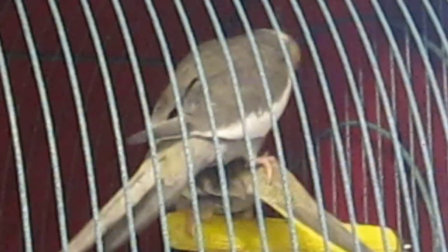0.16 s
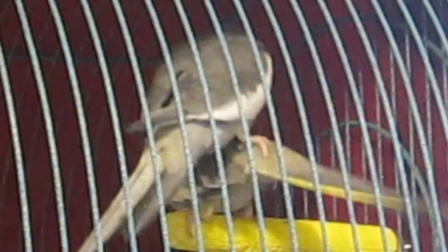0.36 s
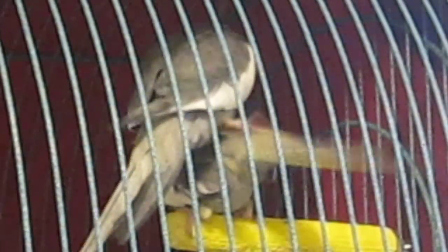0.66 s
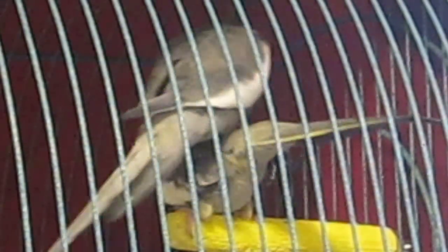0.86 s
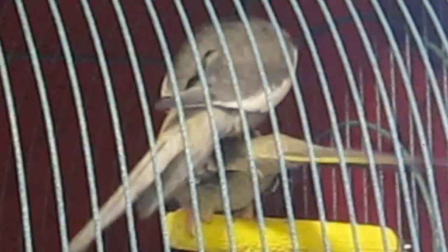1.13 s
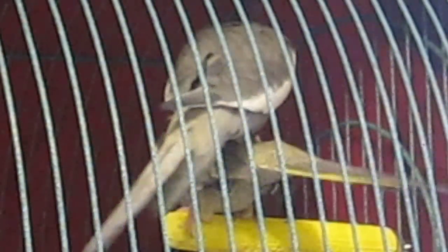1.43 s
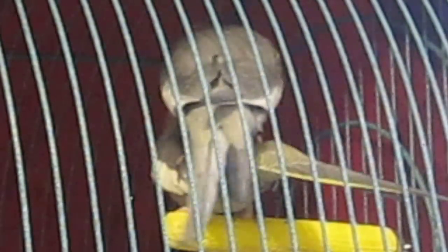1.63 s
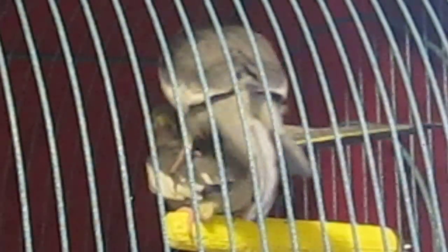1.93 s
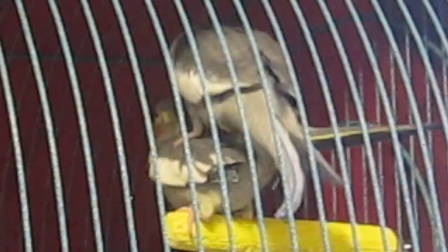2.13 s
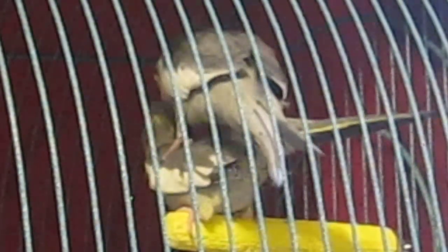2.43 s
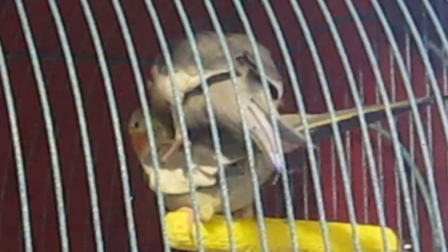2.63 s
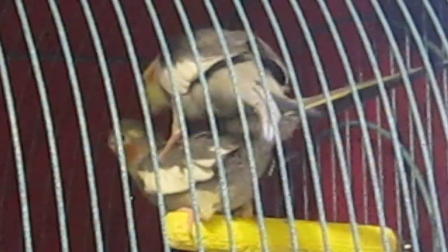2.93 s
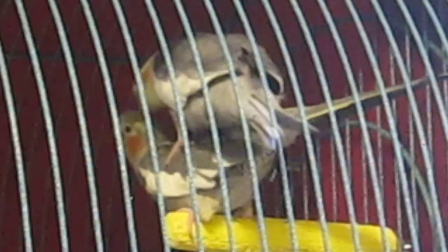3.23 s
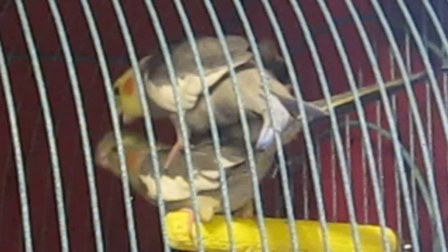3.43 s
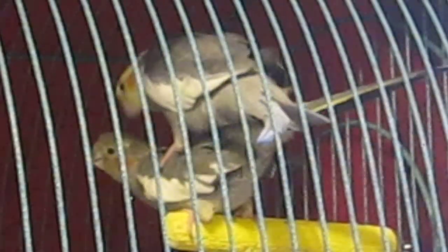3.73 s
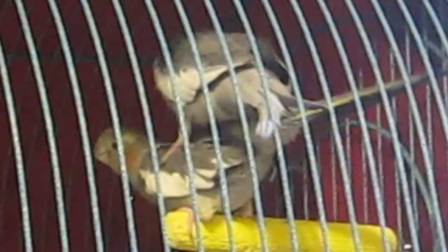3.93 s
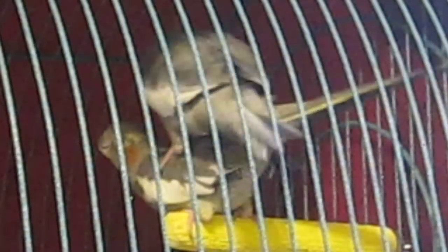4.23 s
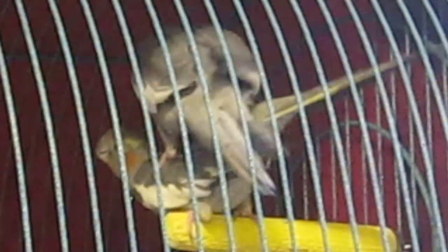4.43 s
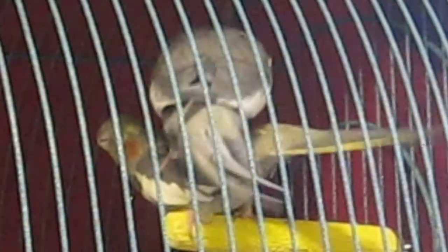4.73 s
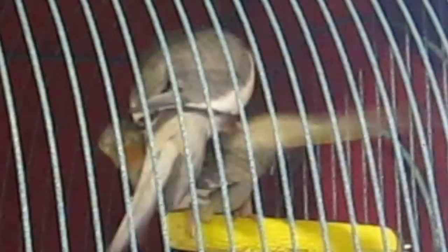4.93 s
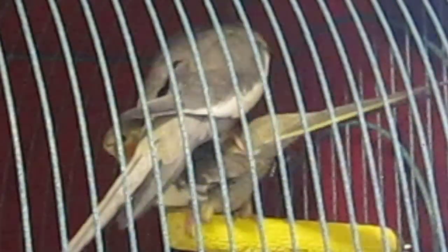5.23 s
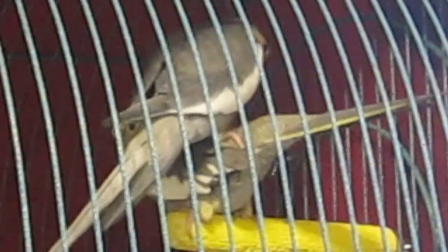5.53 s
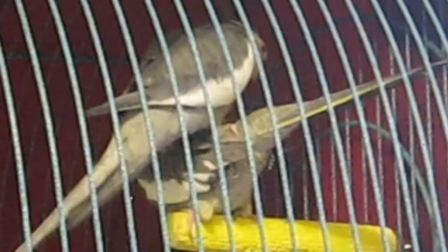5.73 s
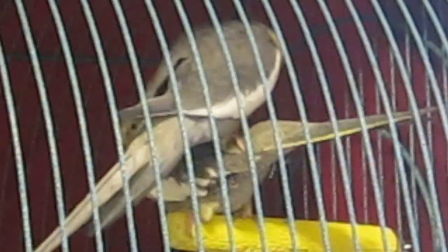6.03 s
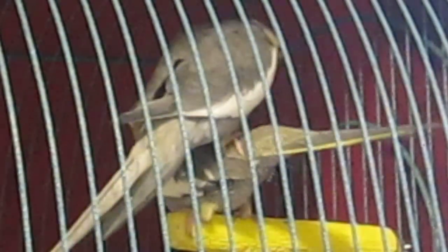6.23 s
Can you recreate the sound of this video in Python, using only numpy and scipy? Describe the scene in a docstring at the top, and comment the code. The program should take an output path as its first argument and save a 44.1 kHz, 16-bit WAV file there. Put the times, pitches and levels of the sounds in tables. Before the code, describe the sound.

In a quiet room at home, two caged cockatiels trade brief, high whistles that arch and fall away. The calls quickly grow harsher, breaking into raspy squawks, then ease back to scattered chirps before a last squawk. The birds are close and the room echoes slightly. Underneath are a steady soft hiss, a faint whine and a low hum that slowly rises, then drops back.

```python
"""Two cockatiels chirp and squawk close by, in a wire cage in a quiet room.
Each call is a whistle near 2.7 kHz from the syrinx, a bird's voice box. It arches, falls away
and breaks into a rasp when it is forced. Nearby walls throw the calls back.
The room hisses softly with a thin whine, and a low hum slowly swells, then sinks back."""
import sys
import numpy as np
from scipy import signal
from scipy.fft import rfft, irfft
from scipy.io import wavfile
from scipy.ndimage import uniform_filter1d

SR = 44100
rng = np.random.default_rng(int(sys.argv[2]) if len(sys.argv) > 2 else 0)


def transcribe(u):
    """Save the signal u as a 16-bit wav file named by the first command-line argument.

    u: samples, shape (n,) or (channels, n), limited to [-1, 1]; the rate is SR.
    q: integer samples, one column per channel.
    """
    v = np.clip(np.atleast_2d(u).T, -1, 1)
    q = np.round(v * 32767).astype(np.int16)
    wavfile.write(sys.argv[1], SR, q)


N = 280476
TIME = np.arange(N) / SR


def undb(db):
    """Turn decibels into a number to multiply by."""
    return 10 ** (np.asarray(db) / 20)


def unit(x):
    """Scale a signal so that its average size (rms) is 1."""
    return x / np.sqrt(np.mean(x ** 2))


def gain_at(hz, points):
    """Read the gain at a pitch from a curve of (pitch_hz, level_db) points."""
    pitch_hz, level_db = np.transpose(points)
    return undb(np.interp(np.log(hz + 1), np.log(pitch_hz), level_db))


def colour(x, points):
    """Turn each pitch in a sound up or down along such a curve."""
    return irfft(rfft(x) * gain_at(np.fft.rfftfreq(len(x), 1 / SR), points), len(x))


def band(hz, width_hz):
    """Noise gathered around one pitch; around 0 Hz it is a random wobble."""
    f = np.fft.rfftfreq(N, 1 / SR)
    return unit(irfft(rfft(rng.standard_normal(N)) / (1 + (2 * (f - hz) / width_hz) ** 2), N))


def drift(rate_hz):
    """A smooth random wander."""
    size = int(SR / rate_hz)
    return unit(uniform_filter1d(uniform_filter1d(rng.standard_normal(N), size), size))


def note_moments(start, crest, end, count=32):
    """Times through a note, the seconds left to its crest (its top), and how much of its fall is done."""
    times = np.linspace(start, end, count)
    return times, np.maximum(crest - times, 0), np.clip((times - crest) / (end - crest), 0, 1)


BEAK_CLOSE_DB = 3.5  # the beak closes as any note falls, dimming the overtone an octave up
# The birds' short whistles, one a row. Levels are relative; roughness runs from 0 (pure) to 1 (harsh).
# start_s, crest_s, end_s, crest_hz, end_hz, level_db, roughness, octave_db, treble_db
CHIRP_NOTES = [ (0, 0.01, .036, 2615, 2050, -40, .15, -6, -1),
               (.671, .709, .742, 2823, 1850, -28, 0.03, -5, -5),
               (1.134, 1.147, 1.176, 2521, 2377, -30.5, 0.17, 0, 4),
               (1.261, 1.267, 1.279, 1289, 1255, -34.5, 0.3, -2, 5),
               (1.286, 1.306, 1.342, 2790, 1675, -28.5, 0.1, 0, 1),
               (1.344, 1.355, 1.363, 1609, 1590, -32.5, .3, -0.5, -5),
               (1.718, 1.726, 1.763, 2730, 1895, -29, 0.33, -9, -7),
               (2.125, 2.135, 2.166, 2830, 2720, -32.5, 0.47, -2, 7.5),
               (2.728, 2.743, 2.755, 1600, 1569, -39.5, 0.64, 7.5, 6),
               (2.76, 2.77, 2.776, 2130, 2096, -44, 0.43, -3.5, -1),
               (3.036, 3.044, 3.07, 2680, 2608, -29, 0.24, -9, 6),
               (3.604, 3.62, 3.628, 2830, 2682, -26.5, .25, 5, 2),
               (3.628, 3.636, 3.682, 2593, 2392, -26, 0.34, 8.5, 8.5),
               (4.105, 4.142, 4.182, 2553, 2220, -33, .13, 1.5, -4),
               (4.25, 4.25, 4.296, 2597, 2001, -31.5, .12, 5, -5),
               (4.327, 4.332, 4.378, 2632, 2210, -31, .14, 1.5, -10),
               (4.696, 4.697, 4.714, 2277, 2184, -35, 0.07, 4.5, -6),
               (5.174, 5.194, 5.24, 2826, 2530, -28.5, 0.18, 3.5, 3.5),
               (5.313, 5.323, 5.35, 2721, 2565, -29.5, 0.11, 5, -3),
               (5.616, 5.626, 5.667, 2640, 2554, -28.5, 0.16, 3.5, -2),
               (5.673, 5.68, 5.72, 2280, 2190, -39, 0.23, 3, -4),
               (5.723, 5.745, 5.768, 2605, 2544, -27, 0.1, -4, -10),
               (6.156, 6.159, 6.17, 2642, 2608, -33.5, 0.23, 6, 2),
               (6.314, 6.321, 6.331, 2730, 2695, -27, 0.11, -5, 2), ]


def chirp(start, crest, end, crest_hz, end_hz, db, rough, octave_db, treble_db):
    """Plan a whistle that scoops up and falls away, softer and rougher at both ends."""
    scoop_hz, scoop_s = 718.6, .03  # this far under the crest, this long before it
    fall_bend, db_per_octave = 1.5, 14.5  # a bend of 1 would be a straight fall
    times, to_crest_s, fall = note_moments(start, crest, end)
    hz = crest_hz - scoop_hz * (to_crest_s / scoop_s) ** 2 - (crest_hz - end_hz) * fall ** fall_bend
    edge = (2 * (times - start) / (end - start) - 1) ** 2  # 1 at both ends, 0 halfway
    level_db = db + db_per_octave * np.log2(hz / crest_hz) - 3.5 * edge
    rough = rough + .11 * edge
    growl_db = -10
    octave_db = octave_db - BEAK_CLOSE_DB * fall
    return np.broadcast_arrays(times, hz, level_db, rough, growl_db, octave_db, treble_db)


# How well throat and beak pass overtones, the whole multiples of a note's pitch: pitch_hz, level_db
THROAT_CURVE = [(2500, -31), (3200, -4), (4300, -14), (5100, -25.5), (5800, -32), (6800, -32), (7700, -40),
                (8500, -30), (10200, -38), (11400, -23.5), (12900, -40.5), (14200, -35), (15500, -44)]


def whistle(phase, hz, strength, rough, octave_db, brighten=0.23, full_db=-28, flicker_db=3):
    """The syrinx's tone: pressing harder lifts the flickering overtones, and roughness frays them."""
    press = (strength / undb(full_db)) ** brighten
    tone = np.sin(phase)
    for k in range(2, 7):
        lift = undb(octave_db) if k == 2 else press ** np.log2(k - 1)
        gain = (k * hz < SR / 2.2) * gain_at(k * hz, THROAT_CURVE) * lift
        fray = .8 * rough * band(0, 200)
        flicker = undb(flicker_db * band(0, 130))
        tone += gain * flicker * np.sin(k * phase + fray)
    return np.sqrt(2) * tone


# The tone colour shared by rasp, growl and screech: pitch_hz, level_db
HARSH_CURVE = [(400, -37.5), (800, -15.5), (1350, -4), (1750, -7), (2300, -6.5), (2900, 0.5), (3600, -4.5),
               (4300, -11), (5500, -18), (6900, -27), (8500, -15.5), (9900, -19.5), (11400, -16),
               (15500, -21)]


def rasp(phase, flutter_hz=330, flutter=0.19, air=0.76, surge_db=0.5):
    """The syrinx's membranes slap shut unevenly, in rattling bursts, and air tears through."""
    cycle = (phase / (2 * np.pi)).astype(int)
    force = rng.standard_normal(N)[cycle]
    slaps = unit(force * np.exp(6 * (np.cos(phase - np.pi) - 1)))  # one slap a cycle
    bursts = np.exp(flutter * band(flutter_hz, 420)) * undb(surge_db * band(100, 33))
    rattle = (slaps + air * rng.standard_normal(N)) * bursts
    rattle = unit(colour(rattle, HARSH_CURVE))
    # a dip in the middle pitches leaves room for the screech
    return colour(rattle, [(700, 3.0), (1300, -4.0), (4500, -0.5), (6500, -0.5)])


def growl(phase, hz, flicker_db=3, stray=0.49):
    """Strong and weak cycles take turns, adding tones at 0.5 and 1.5 times the pitch."""
    flicker = undb(flicker_db * band(0, 120))
    slip = stray * band(0, 414)
    tones = sum(gain_at(k * hz / 2, HARSH_CURVE) * np.sin(k * phase / 2 + slip) for k in (1, 3))
    return np.sqrt(2) * flicker * tones


def screech(phase, hz, beat_hz=470, wander=.16, flicker_db=5):
    """The two sides of the syrinx beat against each other: side tones come and go around the whistle."""
    spacing_hz = beat_hz * np.exp(wander * drift(60))
    beat_phase = 2 * np.pi * np.cumsum(spacing_hz) / SR
    tones = np.zeros(N)
    for k in np.r_[-4:0, 1:7]:  # four below the whistle, six above
        gain = gain_at(np.abs(hz + k * spacing_hz), HARSH_CURVE) * undb(flicker_db * drift(90))
        tones += gain * np.sin(phase + k * beat_phase + 2 * np.pi * rng.random())
    return unit(tones)


def beak(voice, treble_db):
    """A wider beak lets out more treble, the high part of the sound."""
    body = colour(voice, [(6000, -1), (7500, -5)])
    return body + undb(treble_db) * (voice - body)


# The tone colour of the room's air: pitch_hz, relative_level_db
AIR_CURVE = [(15, -47), (25, -6.5), (91, -6), (267, -8), (305, -8.5), (359, -5.5), (433, -8.5), (631, -10),
             (1570, -13), (1850, -9), (2010, -11.5), (2420, -6.5), (3090, -15.5), (8130, -24.5),
             (15500, -28.5)]


def hiss(level_db=-52):
    """The soft, steady hiss of air in the room."""
    return undb(level_db) * unit(colour(rng.standard_normal(N), AIR_CURVE))


# The pitches in the room's whine: pitch_hz, width_hz, level_db
WHINE_BANDS = [(264.7, 15, -67), (2450, 13, -60.5), (2730, 150, -59), (6000, 25, -94), (6720, 38, -77.5),
               (7913, 83, -73)]


def whine():
    """Narrow bands of noise make a thin, steady whine."""
    return sum(undb(db) * band(hz, width_hz) for hz, width_hz, db in WHINE_BANDS)


# The first bounces off nearby surfaces: delay_s, level_db
WALL_ECHOES = [(.0062, -7), (0.0114, -4.5), (0.028, -8.5), (.039, -14), (0.084, -19.5)]


def room(x, ring_s=0.77, treble_ring_s=0.36, build_s=0.031, merge_s=.07, tail_db=-6.0, treble_db=-1):
    """A few clear echoes, then scattered ones that thicken into a tail whose treble dies sooner."""
    t = TIME[:SR]
    density = np.minimum(.004 + (t / merge_s) ** 4, 1)
    scatter = rng.standard_normal(SR) * (rng.random(SR) < density) / np.sqrt(density)
    low = colour(scatter, [(5500, -12.0), (10000, -31)])
    high = undb(treble_db) * (scatter - low)
    tail = low * undb(-60 * t / ring_s) + high * undb(-60 * t / treble_ring_s)
    tail *= 1 - np.exp(-(t / build_s) ** 2)
    echoes = undb(tail_db) * tail / np.linalg.norm(tail)
    for delay_s, db in WALL_ECHOES:
        echoes[int(delay_s * SR)] += undb(db)
    return x + signal.fftconvolve(x, echoes)[:N]


# The birds' forced notes, part whistle and part rasp, one a row. Levels are relative.
# start_s, crest_s, end_s, crest_hz, end_hz, level_db, fade_db,
# start_roughness, end_roughness, growl_db, octave_db, treble_db
SQUAWK_NOTES = [ (1.072, 1.102, 1.1216, 2786, 2450, -30.5, -2, 0.61, 0.35, -6, 2, 9.5),
                (1.179, 1.214, 1.293, 2713, 1703, -30.5, 1.5, 0.27, 0.86, -10, -2.5, 3),
                (1.604, 1.606, 1.61, 2895, 2650, -31, 0.5, .2, .85, -9, 5.5, 3.5),
                (1.632, 1.642, 1.693, 2982, 2648, -31, 2.5, 0.82, 0.71, -2.5, -3, -3),
                (1.767, 1.807, 1.82, 2977, 2900, -29.5, -3, 0.7, .45, -13, 3, 2.5),
                (1.822, 1.825, 1.872, 2875, 1450, -26.5, 10, .36, 0.78, -12, 8.5, 6.5),
                (2.169, 2.203, 2.245, 2826, 2825, -26, 0, 0.82, .5, -12, 2, 5.5),
                (2.21, 2.226, 2.264, 2947, 2522, -20.5, 11, .2, .08, -20, 12, 5.5),
                (2.511, 2.581, 2.697, 2732, 2700, -31, 8, 0.89, 0.86, -23, -3, -0.5),
                (2.592, 2.651, 2.673, 3123, 3102, -24, 3, 0.34, 0.33, -26, 10, 1),
                (2.67, 2.684, 2.712, 3033, 2605, -19.5, 15, 0.13, .26, -23, 7, 0),
                (3.072, 3.081, 3.13, 2645, 2600, -34, 5, 1.07, 1.09, -11, 3, -8),
                (3.122, 3.156, 3.21, 2894, 2085, -19.5, 14.5, 0.33, 0.28, -15, 7.5, 2),
                (3.244, 3.28, 3.32, 2749, 1693, -27.5, 8, 0.63, 0.95, -7.5, 2, -7),
                (5.772, 5.77, 5.812, 2348, 1380, -33, 5.5, 0.69, .5, -15, -6, 0),
                (6.178, 6.192, 6.24, 2800, 2206, -25, 12, 0.11, 0.58, -12, 4, -3),
                (6.333, 6.343, 6.31, 2736, 2450, -21.5, 3.5, 0.17, .3, -12, -5, -1), ]


def squawk(start, crest, end, crest_hz, end_hz, db, fade_db,
           start_rough, end_rough, growl_db, octave_db, treble_db):
    """Plan a forced note: pressure builds pitch and level up to the crest, then gives way."""
    climb_hz_per_s, swell_db, swell_s = 4200, 8.5, 0.034
    fall_bend, fade_bend = 1.55, 1.516
    times, to_crest_s, fall = note_moments(start, crest, end)
    hz = crest_hz - climb_hz_per_s * to_crest_s - (crest_hz - end_hz) * fall ** fall_bend
    level_db = db - swell_db * np.tanh(to_crest_s / swell_s) - fade_db * fall ** fade_bend
    rough = np.interp(times, [start, end], [start_rough, end_rough])
    octave_db = octave_db - BEAK_CLOSE_DB * fall
    return np.broadcast_arrays(times, hz, level_db, rough, growl_db, octave_db, treble_db)


def join_notes(fade_in_s=0.0034, fade_out_s=0.016):
    """Join the planned notes into one voice: close notes slide together, with silence between calls."""
    notes = np.hstack([chirp(*row) for row in CHIRP_NOTES] + [squawk(*row) for row in SQUAWK_NOTES])
    times, *curves = notes[:, np.argsort(notes[0])]
    hz, db, rough, growl_db, octave_db, treble_db = (np.interp(TIME, times, c) for c in curves)
    sounding = sum(np.interp(TIME, [start - fade_in_s, start, end, end + fade_out_s], [0, 1, 1, 0])
                   for start, _, end, *_ in CHIRP_NOTES + SQUAWK_NOTES)
    smooth_hz = uniform_filter1d(hz, size=200)
    strength = undb(db) * np.minimum(sounding, 1)
    return smooth_hz, strength, np.clip(rough, 0, 1), growl_db, octave_db, treble_db


def birds(waver=0.005875, lurch=0.0123, jitter=0.016, falter_db=5, harsh_db=-3, voice_db=-3.5):
    """Roughness shakes the pitch, makes the whistle falter and trades it for growl, screech and rasp."""
    hz, strength, rough, growl_db, octave_db, treble_db = join_notes()
    wobble = waver * band(0, 219.4) + rough * (lurch * band(0, 95.5) + jitter * band(0, 860))
    phase = 2 * np.pi * np.cumsum(hz * (1 + wobble)) / SR  # grows by 2 pi with each vibration
    falter = undb(falter_db * rough * band(46.0, 120)) * (1 + rough * band(0, 340))
    tone = np.sqrt(1 - rough ** 2) * falter * whistle(phase, hz, strength, rough, octave_db)
    harsh = undb(-3) * screech(phase, hz) + rasp(phase)
    voice = tone + rough * (undb(growl_db) * growl(phase, hz) + undb(harsh_db) * harsh)
    return beak(undb(voice_db) * strength * voice, treble_db)


def hum(pitch_hz=40.7, start_s=1.9, full_s=4.3, sink_s=5.72, drop_s=0.088, full_db=-59, after_db=-65):
    """A low hum with a faint drone above it swells, holds, then sinks to a quieter level."""
    tone = np.sin(2 * np.pi * pitch_hz * TIME) * (1 + 0.1 * band(0, 12))
    drone = undb(-4) * band(hz=300, width_hz=130)
    swell = np.interp(TIME, [start_s, full_s, sink_s, sink_s + drop_s],
                      [0, *undb([full_db, full_db, after_db])])
    return swell * (tone + drone)


def scene():
    """The birds and their echoes over the room's quiet sounds, in one channel."""
    return (room(birds()) + hiss() + whine() + hum())[None]


def record(dry, top_hz=15700):
    """Soften the highest treble and cut off everything above it."""
    soft = colour(dry[0], [(14000, -0.5), (15200, -6.5)])
    top_cut = signal.ellip(10, .2, 80, top_hz, fs=SR, output="sos")
    return signal.sosfilt(top_cut, soft)[None]


dry = scene()
out = record(dry)
transcribe(out)
```